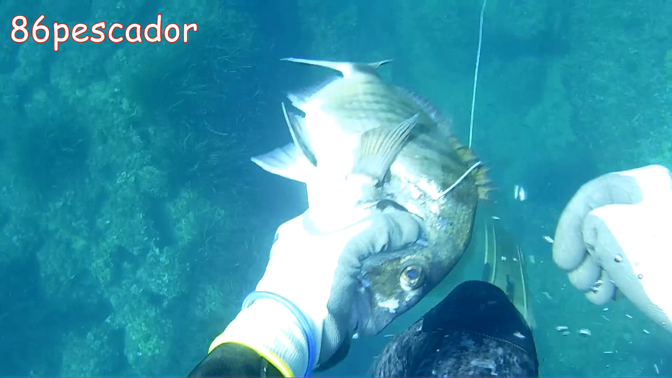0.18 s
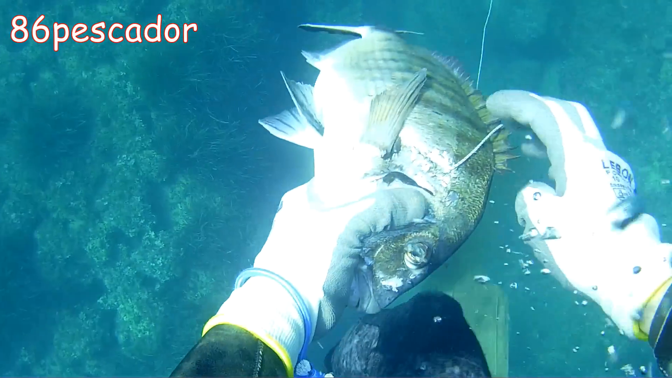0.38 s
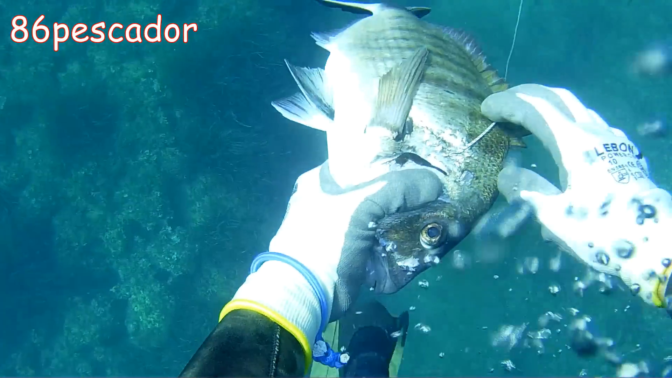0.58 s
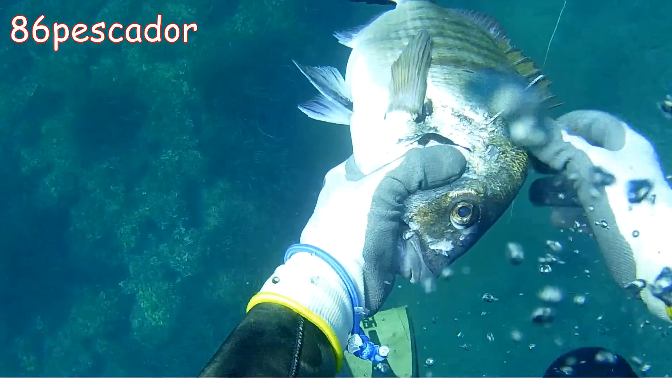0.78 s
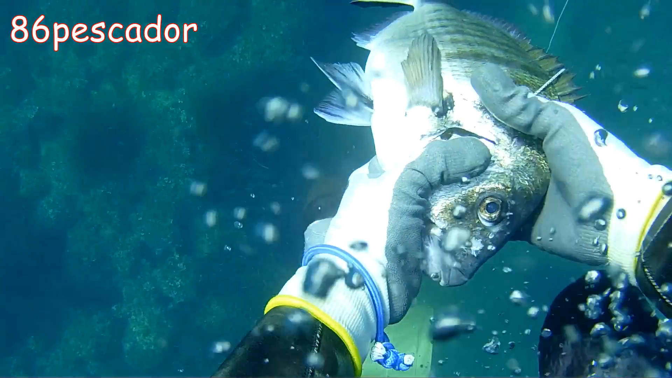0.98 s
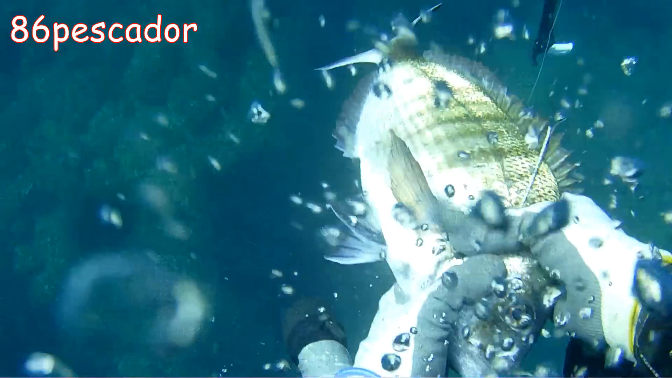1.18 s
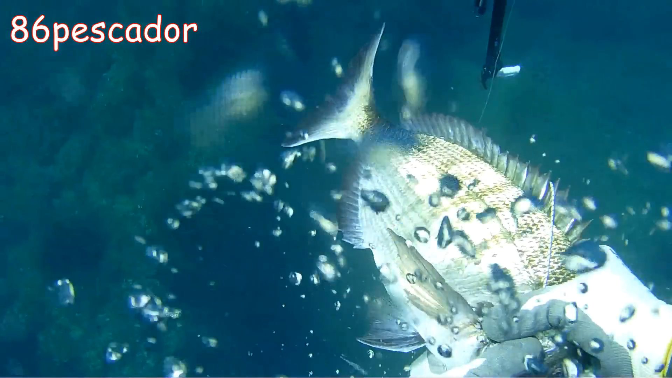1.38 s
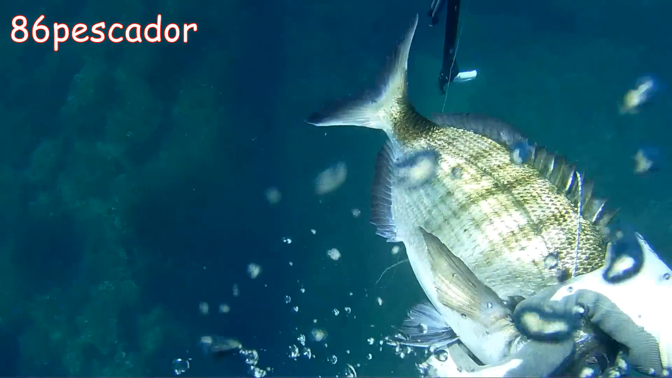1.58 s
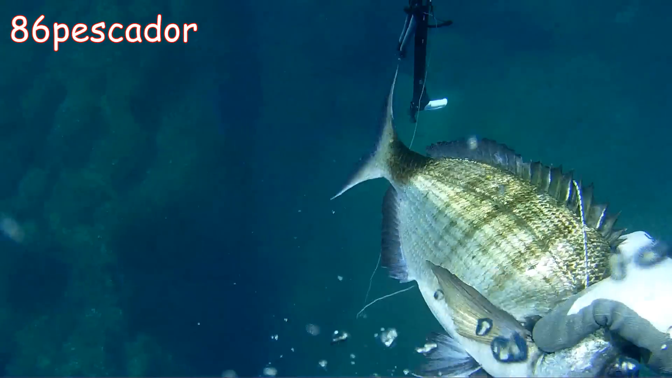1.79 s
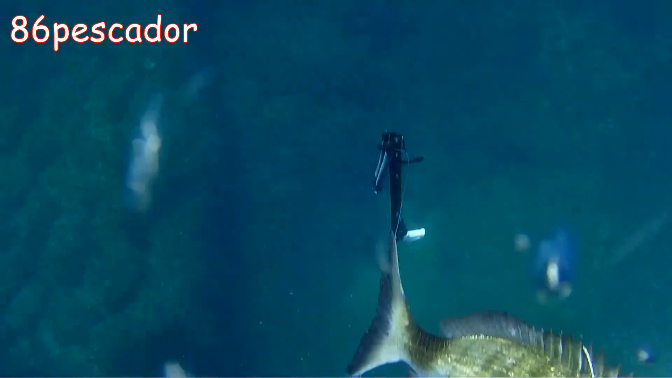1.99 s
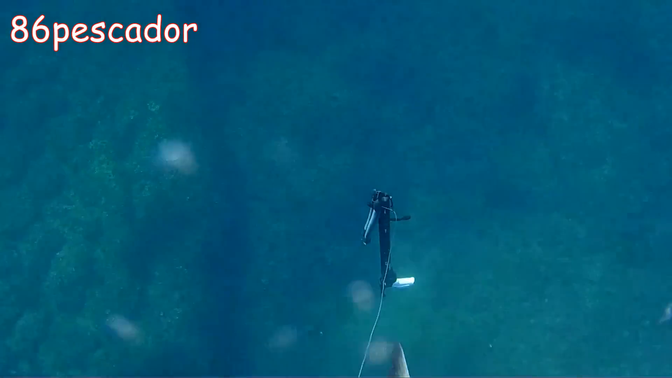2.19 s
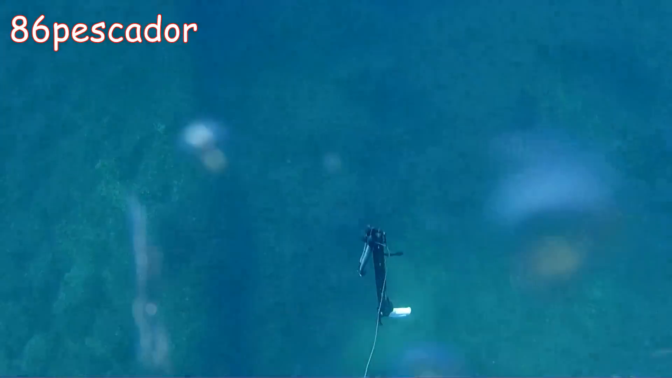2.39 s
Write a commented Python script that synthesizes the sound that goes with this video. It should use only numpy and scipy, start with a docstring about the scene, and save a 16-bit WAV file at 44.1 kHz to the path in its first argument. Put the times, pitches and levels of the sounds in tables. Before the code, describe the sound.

Air bubbles gurgle past a microphone in a watertight underwater case. Low rumble and faint hiss open almost quietly; from 0.2 s hollow bubble tones rush in, loudest around 0.3-0.4 s. Brighter blips and fizz swell at 0.65-0.9 s. A deeper plop comes near 1.1 s, gurgling thickens around 1.4 s, then scattered blips, trickling and tiny sharp clicks continue to 2.5 s, with a boxy hum.

```python
"""Under the sea, a diver's air streams past a camera in a watertight housing.
Near bubbles each ring for a few cycles at the pitch of their size, as fading sines; their knocks and
low thumps are short noise puffs and deep rings. Swarms of randomly timed rings gurgle behind them.
Clusters of tiny rings make fizz and crackle, with sharp clicks of ringing tone and noise.
Filtered noise gives a low rumble and a faint steady hiss; low housing modes hum along with the bubbles."""
import sys
import numpy as np
from scipy import signal
from scipy.fft import rfft, irfft
from scipy.io import wavfile

SR = 44100
rng = np.random.default_rng(int(sys.argv[2]) if len(sys.argv) > 2 else 0)


def store_wav(level_fs):
    """Save 16-bit WAV to argv[1]."""
    pcm = np.round(np.clip(np.atleast_2d(level_fs), -1, 1) * 32767)
    wavfile.write(sys.argv[1], SR, pcm.T.astype(np.int16))


N = 110250  # samples, 2.5 s
TOP_HZ = 16200  # top of the camera's band, and the highest pitch in swarms and spray


def undb(db):
    """Decibels to amplitude gain."""
    return 10 ** (np.asarray(db) / 20)


def unit(x):
    """Scale to rms 1."""
    return x / np.sqrt(np.mean(x ** 2) + 1e-18)


def curve(table, axis=1):
    """Gain over time, gliding in dB through one column of a table."""
    rows = np.array(table)
    return undb(np.interp(np.arange(N) / SR, rows[:, 0], rows[:, axis]))


def add(out, sound, at_s):
    """Mix a sound in at a time in seconds, cut at the end of the scene."""
    start = max(int(at_s * SR), 0)
    part = sound[:max(N - start, 0)]
    out[start:start + len(part)] += part


def colour(x, points):
    """Minimum-phase filter through (Hz, dB) points: it shapes the tone without any pre-echo."""
    size = 4096
    hz, db = np.array(points).T
    freqs = np.maximum(np.arange(size // 2 + 1) * SR / size, 1)
    gain = undb(np.interp(np.log(freqs), np.log(hz), db))
    # folding the cepstrum forward in time makes the filter causal
    cepstrum = irfft(np.log(gain))
    cepstrum[1:size // 2] *= 2
    cepstrum[size // 2 + 1:] = 0
    impulse = irfft(np.exp(rfft(cepstrum)))
    return signal.fftconvolve(x, impulse)[:len(x)]


def burst(decay_s):
    """A very short puff of noise, dying away exponentially."""
    size = 2048
    return rng.standard_normal(size) * np.exp(-np.arange(size) / SR / decay_s)


def ring(hz, cycles):
    """One bubble pulsating: a sine that swells, dies away and rises slightly; envelope peak 1."""
    swell_cycles, rise_per_cycle = 0.64, 0.0029  # build-up; pitch rise as a share of hz
    length = int(SR * (cycles + 1) * np.log(1000) / hz)
    turns = np.arange(length) * hz / SR
    swell = (1 - np.exp(-turns / swell_cycles)) ** 2
    env = swell * np.exp(-turns / cycles)
    return env / env.max() * np.sin(2 * np.pi * turns * (1 + rise_per_cycle * turns / 2))


def random_gain(spread_db, chance):
    """Mostly small bubble strengths with a few strong ones: exponential in dB, capped at pi spreads."""
    return undb(spread_db * min(-np.log(1 - chance), np.pi))


def swarm(per_s, hz, octaves, cycles, spread_db):
    """Many bubbles of random pitch, strength and damping ring at jittered moments."""
    chance = rng.random((int(per_s * N / SR), 5))
    out = np.zeros(N)
    for k, (when, a, b, strength, damping) in enumerate(chance):
        # two draws summed crowd the pitches toward the middle
        pitch = min(hz * 2 ** (2 * octaves * (a + b - 1)), TOP_HZ)
        bubble = ring(pitch, cycles * 2 ** (damping - .5))
        at_s = (k + np.pi * when) / per_s % (N / SR)
        add(out, random_gain(spread_db, strength) * bubble, at_s)
    return out


def spray(per_s, hz, octaves, cycles, spread_db, count=4):
    """Air splits into little clusters of tiny bubbles that ring almost together."""
    split_s = .005  # longest delay within a cluster
    chance = rng.random((int(per_s * N / SR), 2 + 3 * count))
    out = np.zeros(N)
    for k, row in enumerate(chance):
        at_s = (k + np.pi * row[0]) / per_s % (N / SR)
        gain = random_gain(spread_db, row[1])
        for size, delay, strength in row[2:].reshape(count, -1):
            pitch = min(hz * 2 ** (octaves * (2 * size - 1)), TOP_HZ)
            add(out, gain * strength * ring(pitch, cycles), at_s + split_s * delay ** 2)
    return out


def water():
    """Water rumbles around the housing as low noise, over the faint hiss of still water and recorder."""
    # rumble level: start_s, level_db
    rumble_level = [(0, -53), (.12, -53), (.27, -50), (.45, -58), (.62, -60), (.75, -50), (.9, -56),
                    (1.3, -61), (1.7, -60.5), (2.1, -60), (2.3, -56), (2.5, -57)]
    # rumble spectrum: frequency_hz, relative density_db (per Hz)
    rumble_colour = [(20, -1.5), (40, -3), (70, -9), (130, -9.5), (250, -17), (1000, -74)]
    # still water and recorder hiss spectrum: frequency_hz, relative density_db (per Hz)
    hiss_colour = [(20, -2.5), (150, -5.5), (400, -23), (750, -4), (1100, -25), (1700, -40), (2500, -28),
                   (5000, -28.5), (10000, -33.5), (16000, -35.5)]
    rumble = curve(rumble_level) * unit(colour(rng.standard_normal(N), rumble_colour))
    hiss = unit(colour(rng.standard_normal(N), hiss_colour))
    return rumble + undb(-59) * hiss


def clicks():
    """Small snaps of noise, each with a brief high ring, over a faint crackle of tiny bubbles."""
    # sharp clicks, before the shared tone filter: start_s, level_db (before a common lift),
    # ring_hz, snap_db (broad snap relative to the ring)
    snaps = [(0.1147, -42, 6300, -17), (0.1708, -42.5, 4970, -20), (0.322, -52, 4770, -8),
             (0.3933, -40, 7770, -21), (0.4175, -42, 5200, -19), (0.457, -36.5, 6400, -14),
             (0.5852, -44.5, 5250, -2), (0.681, -39, 7200, -16), (0.7358, -34.5, 7120, -11),
             (0.7562, -45, 4400, -4), (0.8245, -29.5, 5640, -11), (0.8854, -44, 4700, 4),
             (1.0852, -31, 9970, -6.5), (1.1303, -38, 4370, -14), (1.1455, -39, 8500, -17),
             (1.1775, -37, 7840, -17), (1.2074, -41.5, 5700, -8), (1.3618, -37, 6360, -5.5),
             (1.5884, -32.5, 5020, -16), (1.6175, -52, 5300, 1), (1.727, -40, 5730, -9),
             (1.7444, -45, 4650, -4), (1.7669, -36.5, 11000, -13), (1.7936, -36.5, 5800, -19),
             (1.9532, -37.5, 4000, -11), (2.0327, -39, 5700, -7), (2.044, -33, 5270, -12),
             (2.1144, -33.5, 6650, -8), (2.156, -35.5, 6900, -17), (2.216, -44, 7120, -8),
             (2.3301, -28, 4550, -20), (2.4043, -35.5, 4660, -10), (2.458, -32.5, 6930, -18)]
    # crackle level before the shared tone filter: start_s, level_db
    crackle_level = [(0, -97), (.2, -70), (.35, -60), (.6, -72), (.76, -58.5), (1.05, -75), (1.35, -67),
                     (1.52, -73.5), (1.72, -66), (1.87, -70), (2.13, -63), (2.3, -65), (2.5, -62.5)]
    lift_db, ring_s, rise_s, snap_s = 1, 0.001, 0.00038, 0.0016
    out = np.zeros(N)
    for at_s, db, hz, snap_db in snaps:
        # a broad resonance centres the snap on its ring
        snap = 2 * signal.lfilter(*signal.iirpeak(hz, 1.1, fs=SR), burst(snap_s))
        t = np.arange(len(snap)) / SR
        tone = np.sin(2 * np.pi * hz * t) * np.exp(-t / ring_s)
        onset = 1 - np.exp(-t / rise_s)
        add(out, undb(db + lift_db) * onset * (tone + undb(snap_db) * snap), at_s + .001)
    crackle = spray(per_s=85, hz=9260, octaves=0.71, cycles=8.1, spread_db=3.5)
    tone_filter = [(500, 10), (4500, 4), (7000, 2.5), (8800, -3.5), (10000, -0.5), (15000, -4)]  # Hz, dB
    return colour(out + curve(crackle_level) * unit(crackle), tone_filter)


def fizz():
    """Fine spray, clusters of tiny rings heard through the housing, swells and thins."""
    # spray level: start_s, level_db
    spray_level = [(0, -85), (.17, -69), (.24, -55), (.33, -46), (.46, -53), (.6, -47), (.69, -41),
                   (.76, -43.5), (.86, -48), (1.0, -55.5), (1.15, -60), (1.3, -48), (1.5, -63.5),
                   (1.68, -58.5), (1.85, -63), (2.0, -49.5), (2.14, -50.5), (2.3, -53), (2.5, -60.5)]
    # colour of the spray through the housing: frequency_hz, gain_db
    spray_colour = [(600, -15), (1700, -16), (2350, -3), (2850, 3), (3400, 4), (4100, -10), (4700, -5.5),
                    (5300, -2), (6800, -2), (8800, -14), (15000, 0)]
    droplets = spray(per_s=150, hz=3276, octaves=0.634, cycles=7.2, spread_db=6.5)
    return curve(spray_level) * unit(colour(droplets, spray_colour))


def stream():
    """Large, medium and small bubbles rush by as swarms of rings; the deepest, briefest ones only glug."""
    # swarm levels before each swarm's trim: start_s, large_db, medium_db, small_db, low_wash_db
    flow = [(0.0, -49.5, -64.5, -67, -47), (0.13, -59.5, -68.5, -73, -58.5), (0.25, -42.5, -49.5, -54, -43),
            (0.35, -41, -41.5, -61, -69), (0.39, -44, -44.5, -65, -54), (0.59, -42, -46.5, -61, -48),
            (0.81, -39, -39.5, -48, -54.5), (0.99, -40.5, -45.5, -53.5, -49.5),
            (1.16, -40.5, -50, -62, -46.5), (1.27, -42, -42, -49.5, -47.5), (1.41, -38, -40, -54, -46.5),
            (1.54, -47, -45, -59, -56.5), (1.71, -44.5, -44, -54, -61.5), (2.01, -42, -46, -65, -54.5),
            (2.12, -41.5, -38, -47, -55), (2.25, -44.5, -43.5, -58.5, -51), (2.39, -45.5, -46, -56, -53),
            (2.5, -46.5, -42, -83, -53.5)]
    # swarms, large to small: rate_per_s, middle_pitch_hz, pitch_spread_octaves, decay_cycles (middle),
    # strength_spread_db, trim_db
    swarms = [(380, 746, 0.33, 3.97, 4, 1.5), (616.9, 1610, 0.2305, 5.9, 4.5, 2),
              (331.3, 2980, .25, 12, 6.5, 0)]
    # colour of the swarms through the housing: frequency_hz, gain_db
    through_housing = [(100, -28.5), (350, 13.5), (520, -7), (700, -0.5), (950, -1.5), (1200, 5),
                       (1700, 4.5), (1950, 5.5), (2300, 1.5), (2800, 0), (3400, 3), (4100, -1.5),
                       (8000, -14)]
    glugs = swarm(per_s=260, hz=297.2, octaves=0.52, cycles=1.3, spread_db=4.5)
    out = undb(-2) * curve(flow, axis=4) * unit(glugs)
    for k, (per_s, hz, octaves, cycles, spread_db, trim_db) in enumerate(swarms):
        rings = swarm(per_s, hz, octaves, cycles, spread_db)
        out += undb(trim_db) * curve(flow, axis=k + 1) * unit(colour(rings, through_housing))
    return out


def near_bubbles():
    """Single loud bubbles ring and knock the housing, lower and shorter ones harder; big ones thump."""
    # near bubbles: start_s, ring_level_db (envelope peak), pitch_hz and decay_cycles (to 1/e),
    # in the order start_s, pitch_hz, ring_level_db, decay_cycles
    bubbles = [(0.021, 819, -42, 9.8), (0.116, 1710, -42.5, 10), (0.171, 716, -32, 3),
               (0.2035, 708, -23.5, 4.2), (0.2051, 1546, -23, 10.7), (0.2329, 1548, -21.5, 11.7),
               (0.2376, 1033, -23.5, 3.1), (0.2651, 682, -29.5, 7.7), (0.272, 1500, -20, 2.1),
               (0.3017, 1650, -25.5, 6.8), (0.3122, 790, -22.5, 5.1), (0.3148, 680, -11, 2.3),
               (0.3221, 1600, -18.5, 3.1), (0.3217, 2640, -22, 1.3), (0.321, 573, -20, 1.8),
               (0.353, 1050, -29, 10.5), (0.3599, 700, -10, 7.4), (0.3758, 689, -14.5, 4.7),
               (0.3775, 970, -18, 7.2), (0.419, 785, -20, 0.8), (0.4224, 1423, -25, 9.9),
               (0.4383, 3180, -35, 11), (0.4454, 790, -20, 3.4), (0.4665, 725, -26, 4.2),
               (0.4816, 750, -28.5, 4.4), (0.5038, 1867, -18, 9.7), (0.5108, 690, -25, 1.4),
               (0.5141, 1530, -18.5, 1.8), (0.5314, 1032, -32.5, 13), (0.5527, 1110, -24.5, 3.2),
               (0.6289, 817, -29.5, 4.3), (0.672, 2670, -28.5, 6.9), (0.673, 1670, -23.5, 3.8),
               (0.682, 2060, -23.5, 2), (0.6822, 2490, -27.5, 1.3), (0.6932, 1870, -22, 5.3),
               (0.7055, 2530, -27.5, 1.4), (0.7418, 1750, -24, 6.5), (0.752, 1850, -23, 4),
               (0.7552, 2490, -28, 1.7), (0.7939, 675, -24, 0.9), (0.8195, 3195, -21.5, 11),
               (0.8216, 1870, -27, 6), (0.8232, 1110, -21, 1.7), (0.8247, 1370, -22, 7.5),
               (0.8272, 2830, -19, 9), (0.8478, 2960, -26.5, 4.5), (0.8599, 1766, -25, 6),
               (0.8642, 1420, -23.5, 1.7), (0.8868, 1675, -20.5, 3.5), (0.9546, 620, -19, 1.17),
               (1.0297, 713, -35, 8.7), (1.0423, 705, -32, 9), (1.111, 499.4, -16, 4),
               (1.1132, 384, -34, 3.3), (1.1205, 541, -25, 5.7), (1.1684, 772, -20, 3.8),
               (1.208, 879, -31, 11), (1.2452, 1710, -24, 3.6), (1.3057, 690, -24.5, 0.64),
               (1.3216, 3260, -32.5, 8.6), (1.3375, 3440, -28, 7.1), (1.3585, 746, -20, 4.4),
               (1.373, 1630, -21.5, 2.9), (1.379, 1700, -24, 3.4), (1.623, 1230, -30, 2.4),
               (1.736, 1770, -24.5, 7.7), (1.7414, 2900, -24, 3.1), (1.7587, 2770, -32, 9.8),
               (1.8619, 726, -25.5, 2.7), (1.8912, 665, -27, 3.1), (1.909, 916, -21, 1.6),
               (1.9192, 660, -28.5, 4.6), (1.9528, 3250, -31.5, 17), (1.9541, 1560, -26.5, 6.9),
               (2.118, 2880, -33, 1.6), (2.1434, 1640, -22.5, 4.4), (2.184, 1600, -26, 5.8),
               (2.2064, 1680, -24.5, 4), (2.2301, 713, -22.5, 5), (2.2642, 3280, -29.5, 6.2),
               (2.2668, 1640, -27, 5.6), (2.33, 1664, -29.5, 6.5), (2.3308, 4700, -23.5, 6.7),
               (2.3422, 1670, -23.5, 4.8), (2.3702, 1750, -26.5, 4.3), (2.3713, 2950, -28.5, 5.1),
               (2.4035, 1462, -27.5, 8.3)]
    # what the housing rings with when knocked: frequency_hz, gain_db
    housing = [(60, -23), (180, 0), (300, -2), (700, -0.5), (1150, -22.5), (1650, -4), (2300, -7),
               (3000, -21), (4200, -24.5), (12000, -55.5)]
    thump_hz, thump_cycles, thump_db, thump_below_hz = 175, 0.92, -17.5, 468  # full thump below this pitch
    rings, knocks = np.zeros(N), np.zeros(N)
    for at_s, hz, db, cycles in bubbles:
        add(rings, undb(db) * ring(hz, cycles), at_s)
        # a big bubble also shoves the water
        bigness = min(thump_below_hz / hz, 1) ** 5 * min(cycles / 2, 1)
        thump = bigness * ring(thump_hz, thump_cycles)
        add(rings, undb(db + thump_db) * thump, at_s - .5 / thump_hz)
        knock = burst(decay_s=0.0044)
        knock *= 1 - np.exp(-np.arange(len(knock)) * hz / SR)  # softer onset for lower pitch
        force = np.sqrt(SR / hz / (2 + cycles))
        add(knocks, undb(db) * force * knock, at_s + .5 / hz)
    return rings + undb(-8) * colour(knocks, housing)


def hum(x):
    """The low modes of the housing resonate with the bubbles and ring on after them."""
    # housing modes: frequency_hz, decay_s (to 1/e), gain_db
    modes = [(362, 0.065, -5), (186, 0.02, -14.5)]
    out = np.zeros(N)
    for hz, decay_s, db in modes:
        resonator = signal.iirpeak(hz, np.pi * hz * decay_s, fs=SR)
        out += undb(db) * signal.lfilter(*resonator, x)
    return out


def scene():
    """Everything reaches one microphone inside the housing."""
    background = water() + clicks() + fizz()
    bubbles = stream() + near_bubbles()
    return (background + bubbles + hum(bubbles))[None]


def record(dry):
    """The camera cuts the top with a steep low-pass."""
    return signal.sosfilt(signal.ellip(10, .2, 80, TOP_HZ, fs=SR, output="sos"), dry)


dry = scene()
out = record(dry)
store_wav(out)
```